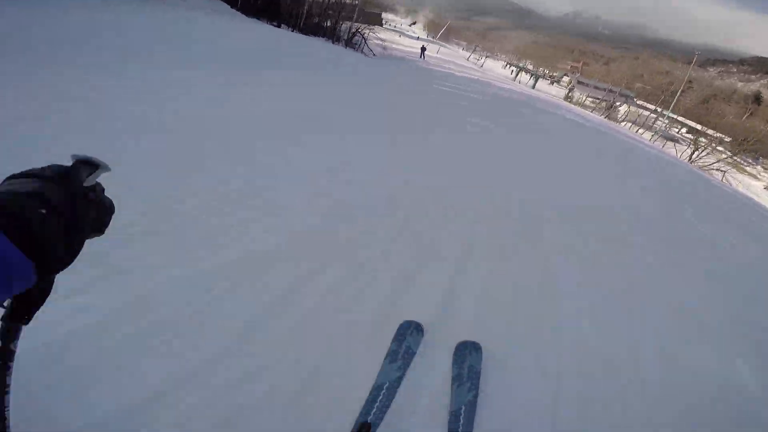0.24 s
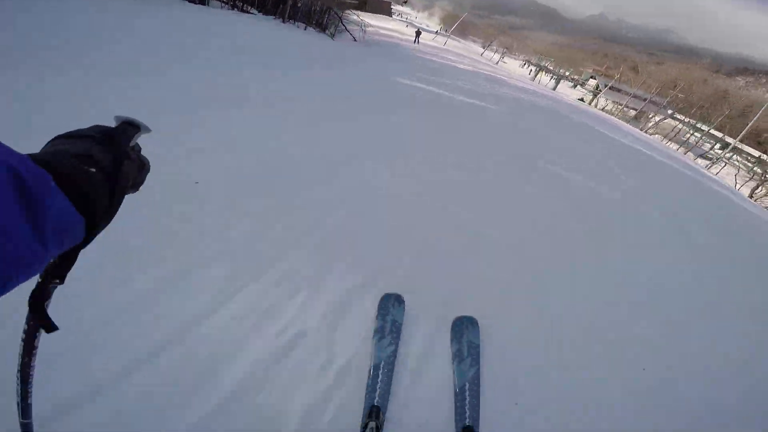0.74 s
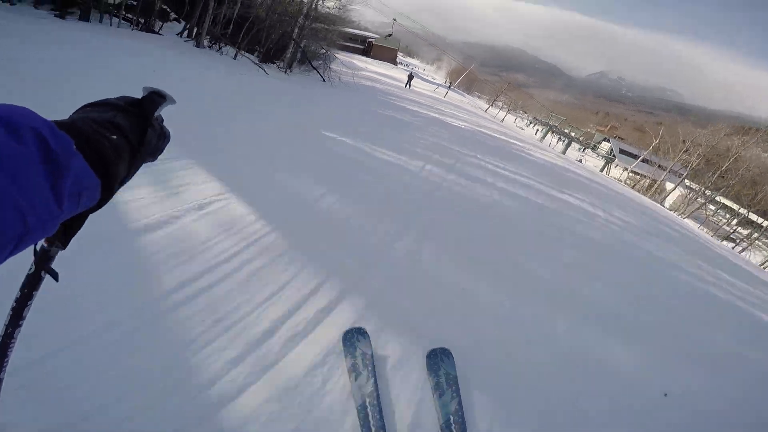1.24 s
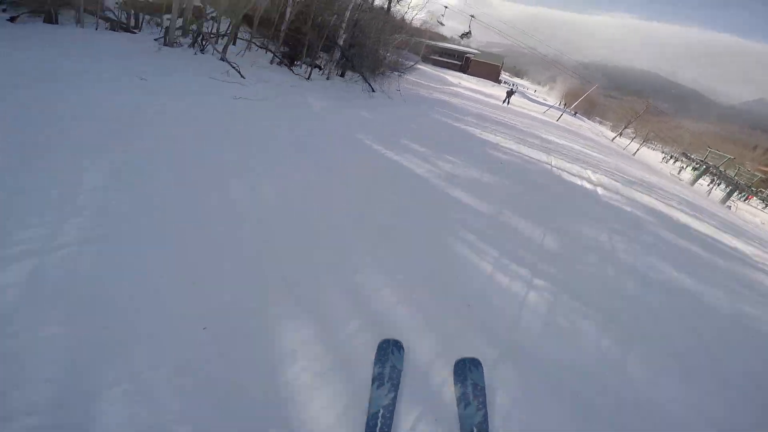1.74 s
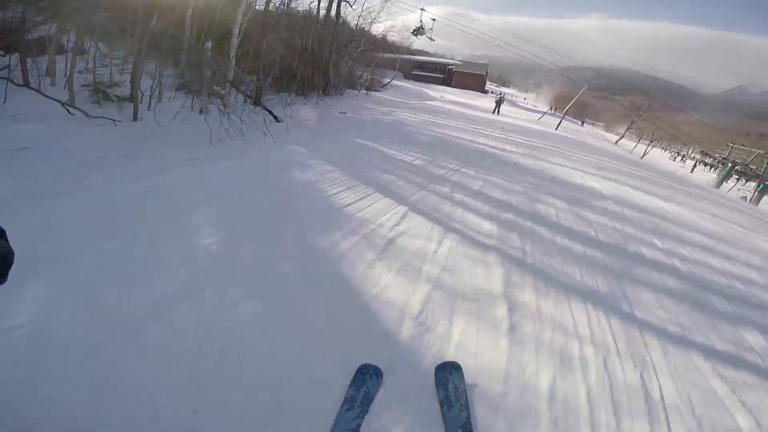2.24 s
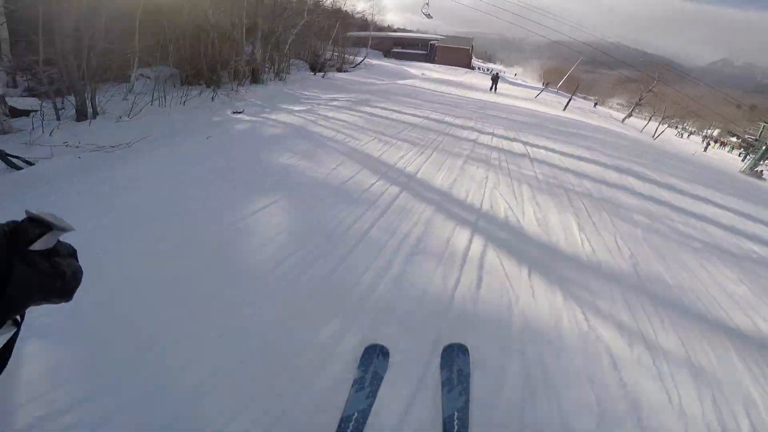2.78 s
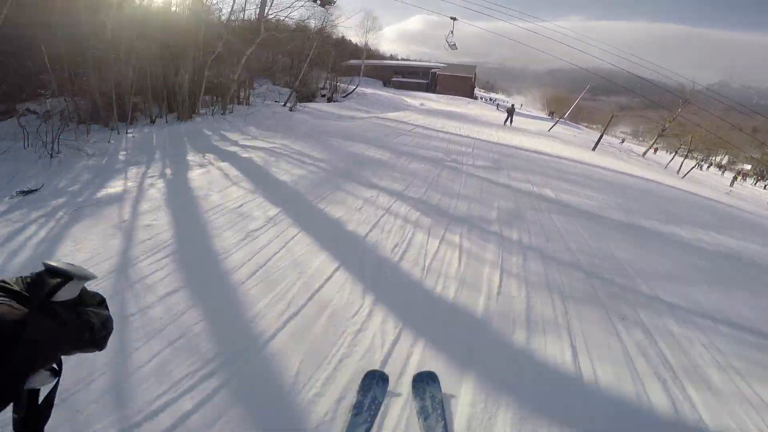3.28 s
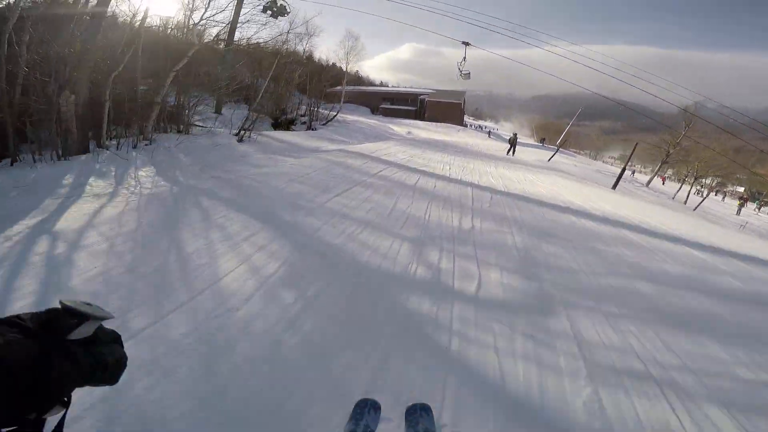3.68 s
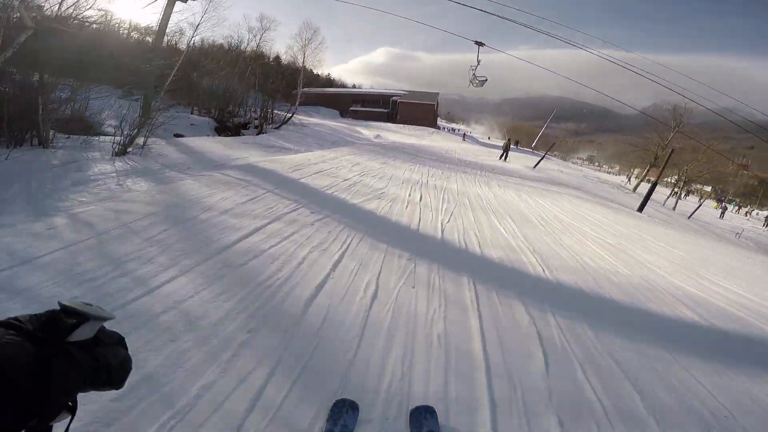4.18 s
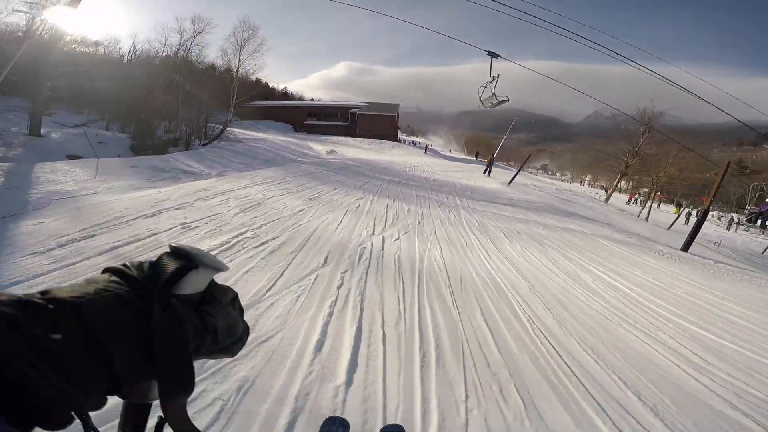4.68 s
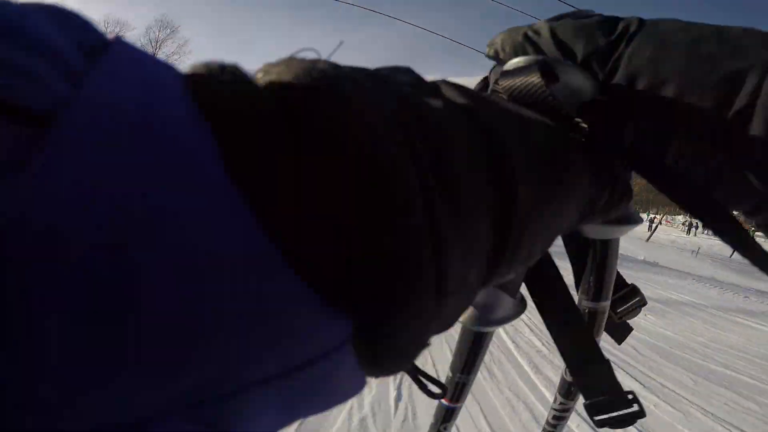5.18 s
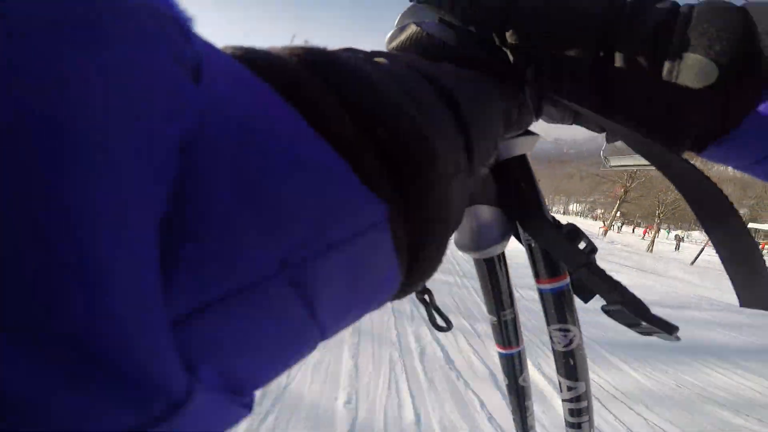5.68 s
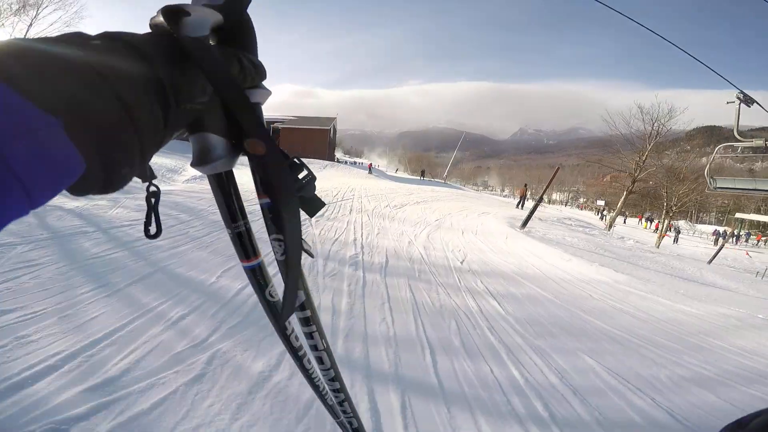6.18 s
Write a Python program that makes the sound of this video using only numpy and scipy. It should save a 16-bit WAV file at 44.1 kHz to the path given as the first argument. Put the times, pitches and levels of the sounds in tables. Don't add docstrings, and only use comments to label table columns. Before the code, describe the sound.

From inside a sealed camera case, icy ski glide crackles and thrums under rumbling wind, with a buckle tick, binding knock, pole clatter and glove rub.

```python
import sys
import numpy as np
from scipy import signal
from scipy.fft import rfft, irfft
from scipy.io import wavfile
from scipy.ndimage import uniform_filter1d

SR = 44100
rng = np.random.default_rng(int(sys.argv[2]) if len(sys.argv) > 2 else 0)


def volts(x):
    e = np.asarray(x, float) / 20
    return 10 ** e


def wav_record(signal):
    frames = np.transpose(np.atleast_2d(signal))
    bounded = np.clip(frames, -1, 1)
    quanta = np.round(bounded * 32767).astype(np.int16)
    wavfile.write(sys.argv[1], SR, quanta)


N = 283108

# t/s, level over the usual strength/dB
AIRFLOW = [(0, -2), (.45, 4.5), (.62, 13.5), (.9, 4), (1.3, 3.5), (1.55, 6.5), (1.8, 4.5), (2.0, 10.5),
           (2.25, 10), (2.6, 9), (2.9, 5), (3.3, -11), (3.7, -11), (4.3, -9), (5.15, 2.5), (5.7, -5),
           (6.1, 7), (6.42, 13)]
# t/s, load over the usual/dB
LOAD = [(0, -2.5), (.27, -5), (.37, 3.5), (.64, 6.5), (.9, 3.5), (1.2, 4), (1.55, 5.5), (1.95, 4),
        (2.27, 10.5), (2.45, 5.5), (2.9, 0.5), (3.2, -1), (4.0, -4.5), (4.5, -12), (4.9, -4), (5.3, -1),
        (6.0, -5), (6.35, 4)]
# f/Hz, level per Hz/dB
ROAR_COLOUR = [(240, 0), (400, -11), (493, -3), (535, -8), (655, 0), (740, 2.5), (826, -11.5), (1270, -1),
               (1380, -6), (1600, -1), (2080, -2), (3520, -120)]
# f/Hz, level per Hz/dB
FITTING_CRACK = [(900, -25), (1500, -40), (3500, 6), (5500, -5), (7300, 4), (8800, -7), (11000, 3),
                 (15300, -11)]


def glide():
    # t/s, edge pressure/dB, looseness of the snow/dB
    edges = [(0.0, -39, 3.5), (0.11, -41, -2), (0.16, -37.5, 0.5), (0.39, -40, 1), (0.55, -36.5, -1),
             (0.8, -37, -0.5), (1.2, -33, -3.5), (1.77, -36, -2), (2.3, -40, 2.5), (2.95, -42, 0),
             (3.3, -40, -3), (3.6, -43, -2), (4.5, -44, -4), (4.9, -45, -1), (5.3, -45.5, -3.5),
             (5.42, -46, -2), (5.9, -47, 3), (6.3, -46.5, 0.5)]
    # t/s, half length/s, extra pressure/dB
    patches = [(0.004, 0.028, -2.5), (.2, 0.019, 2), (.29, 0.021, 0), (.445, 0.0089, 5), (1.26, 0.041, 2),
               (2.02, 0.12, 3), (2.22, 0.062, 3), (3.14, 0.036, -1), (3.4, 0.021, 3), (3.75, 0.071, 2),
               (4.04, 0.12, 3.5), (4.33, .022, 2.5), (4.75, 0.086, 2.5), (5.0, 0.064, 3.5),
               (5.17, 0.074, 4), (5.33, 0.018, 5.5), (5.66, 0.013, 2), (6.04, 0.035, 1), (.6, .04, 1),
               (.69, 0.027, 3.5), (.77, .03, 1), (.9, 0.04, 2.5), (1.07, 0.048, 1), (1.45, 0.054, 1),
               (1.62, 0.032, 1), (2.29, 0.03, 3), (2.53, 0.023, 3), (2.65, .025, 0), (2.84, 0.028, 2),
               (3.06, 0.039, 3), (3.2, .02, -2), (3.33, .03, -1), (3.49, 0.025, -3.5), (3.64, 0.038, -3.5),
               (3.88, 0.024, 1.5), (4.24, 0.035, -1), (4.87, .04, -1.5), (5.25, .025, 0.5), (5.87, .04, 2)]
    # f/Hz, level per Hz/dB
    wall = [(300, -28), (1100, -28), (1480, -27), (1650, -16), (2450, -11.5), (3100, -15.5), (4600, -14.5),
            (5100, -18), (7800, -21.5), (8500, -27.5), (13500, -27), (15500, -32.5)]
    # f/Hz, width/Hz, level/dB
    case = [(1854, 205, -0.5), (2246, 102, -7), (2850, 153, -8.5), (3496, 280, -15.5), (4250, 210, -16.5),
            (6150, 89, -15.5), (7380, 210, -23), (9900, 1400, -28.5)]
    steady_db, loose_db = along(edges)
    patch_db, = swells(patches)
    pressure_db = steady_db + patch_db
    spray_db = steady_db - 8.5 + 0.48 * loose_db + 0.51 * patch_db

    grain_db = 1.83 * np.minimum(rng.exponential(1, N), 5)
    struck = rng.random(N) < 700 / SR
    grains = volts(grain_db) * struck * rng.choice([-1, 1], N)
    puff = rng.standard_normal(200) * np.exp(-np.arange(200) / 40)
    crackle = evened(signal.oaconvolve(grains, puff)[:N])

    ridges = wobble(18)
    noise = rng.standard_normal((3, N))
    ringing = volts(1.8 * ridges + 0.59 * wobble(150)) * noise[0] + 0.25 * crackle
    grit = volts(0.11 * ridges + 1.86 * wobble(63)) * noise[1] + 0.34 * crackle
    spray = volts(0.79 * ridges + 0.82 * wobble(70)) * noise[2] + 0.33 * crackle

    resonances_only = colour([*wall[:2], (20000, -58.0)], case)
    bodies = [resonances_only, colour(wall), colour(wall, case)]
    ringing, grit, spray = signal.oaconvolve([ringing, grit, spray], bodies, axes=1)[:, :N]
    split = signal.butter(4, 4750, fs=SR, output="sos")
    low = signal.sosfiltfilt(split, ringing + volts(loose_db) * grit)
    high = spray - signal.sosfiltfilt(split, spray)
    return volts(pressure_db - 0.3) * evened(low) + volts(spray_db + 1.55) * evened(high)


def chips():
    # t/s, snap level/dB, centre f/Hz, ring over snap/dB
    flying = [(0.15, -32, 3960, -8), (0.2029, -29.5, 4120, 0), (0.289, -32, 7240, 3),
              (0.3062, -30.5, 3280, 4), (0.3271, -32, 4000, 2), (0.547, -29, 2900, -1),
              (0.6065, -27, 3440, 5), (0.677, -29, 2720, 0), (0.7444, -32, 4000, -28),
              (0.817, -27.5, 3790, -8), (0.84, -40, 2600, 9), (0.945, -31, 3630, 8), (0.9782, -26, 2820, 0),
              (1.032, -30, 4050, 5.5), (1.2688, -32, 4280, 8), (1.5876, -37, 2800, 14),
              (2.0107, -24.5, 2920, -3), (2.2117, -26, 3050, 0), (2.255, -25, 3380, 1),
              (2.362, -31, 3000, 1.5), (2.563, -34, 2680, 6), (2.8406, -37.5, 3500, 8.5),
              (3.038, -31, 3400, 2), (3.7495, -40, 3180, 5), (4.059, -32, 3070, -2),
              (4.326, -43.5, 2840, 15), (5.3324, -36.5, 2650, 11), (5.842, -38, 3200, -17),
              (5.9228, -34.5, 2780, -10), (6.0462, -36, 3560, -3)]
    # t/s, snap level/dB, centre f/Hz, knock over snap/dB
    cracked = [(0.011, -32, 6430, -30), (0.295, -31, 4470, -8), (0.442, -45, 3530, 2),
               (1.535, -33, 1700, -6), (1.655, -44, 2800, 9), (2.055, -31, 3270, -3),
               (2.176, -37, 3680, -3), (2.348, -34, 5640, -4), (2.388, -36, 7500, -21),
               (2.3986, -25, 3330, -6), (2.4262, -27, 4500, -19), (2.4487, -27, 3860, -11),
               (2.4733, -31.5, 3900, -12), (2.5951, -27, 2970, -22), (2.6486, -39, 2470, -7),
               (2.6825, -30.5, 2670, -9), (2.75, -30, 3300, -22), (2.785, -32, 3400, -20),
               (2.9619, -31, 3670, -12), (5.218, -38, 3870, -2), (5.6576, -46, 3040, 4),
               (.4152, -36, 3300, -25), (.6337, -30, 3100, -27), (1.0249, -30, 4200, -27),
               (2.141, -33, 4000, -25), (2.3, -35, 3700, -25), (2.518, -33, 3600, -22),
               (2.543, -39, 4000, -25), (2.848, -41, 3000, -25)]
    usual_ring_db, usual_knock_db = -4, -43
    rows = [(*chip, usual_knock_db) for chip in flying]
    rows += [(*chip[:3], usual_ring_db, chip[3]) for chip in cracked]
    out, t = np.zeros(N), np.arange(900) / SR
    for s, snap_db, hz, ring_db, knock_db in rows:
        noise = rng.standard_normal(900)
        hard_break = 6 * (t == t[8])
        crack = (noise + hard_break) * np.minimum(t / 0.00051, 1) * np.exp(-t / 0.0021)
        pitch = hz * (0.79 + 0.15 * np.minimum(t / 0.0084, 1))
        snap = through_wall(resonate(resonate(crack, pitch, 0.5 * hz), pitch, 0.5 * hz))
        ring = through_wall(resonate(resonate(crack, 1887, 140), 2090, 280))
        knock = resonate(resonate(noise * np.exp(-t / 0.0051), 770, 610), 710, 860)
        chip = volts(4) * peaked(snap) + volts(ring_db) * peaked(ring) + volts(knock_db) * peaked(knock)
        add(out, s - 0.0004, volts(snap_db) * chip)
    return out


def boards():
    # t/s, peak level/dB, pitch f/Hz
    slaps = [(0.683, -46, 188), (1.038, -20.5, 111), (1.208, -34, 121), (1.414, -40, 200),
             (1.473, -29, 200), (1.546, -32, 167), (1.595, -25, 170), (1.673, -26, 128), (1.726, -30, 250),
             (1.824, -27.5, 102), (2.039, -22.5, 126), (2.089, -20, 227), (2.323, -24, 246),
             (2.17, -21, 130), (2.231, -29, 221), (2.856, -28, 197), (2.894, -23, 158), (2.986, -27, 136),
             (3.342, -31, 103), (4.95, -36, 135), (5.101, -34.5, 192), (5.427, -34, 118), (5.698, -31, 175),
             (5.867, -29, 130), (5.929, -31, 102), (6.131, -31, 140), (6.221, -20.5, 159),
             (6.247, -21.5, 151), (6.364, -15.5, 121), (6.383, -14.5, 145)]
    load_db, = along(LOAD)
    air_db, = along(AIRFLOW)
    flutter_db = -50 + 0.58 * load_db + 0.28 * air_db
    thrum_db = -54 + load_db
    bumps = wobble(29)
    flutter = band(92.5, 159.7) + 0.75 * band(147.4, 234.0)
    flutter = evened(flutter * volts(1.7 * bumps))
    shake = band(188, 368)
    thrum = shake + 0.9 * resonate(shake, 395, 125)
    thrum = evened(thrum * volts(1.0 * bumps + 0.81 * wobble(45)))
    out = volts(flutter_db) * flutter + volts(thrum_db) * thrum

    t = np.arange(2000) / SR
    shape = t / 0.004 * np.exp(-t / 0.0029)
    noise = rng.standard_normal((len(slaps), 2000))
    rattles = signal.oaconvolve(noise, colour(ROAR_COLOUR)[None], axes=1)[:, :2000]
    for (s, db, hz), rattle in zip(slaps, rattles):
        tone = np.sin(2 * np.pi * hz * t) + 0.18 * np.sin(2 * np.pi * 355 * t)
        thump = peaked(shape * tone)
        add(out, s, volts(db - 5.5) * (thump + volts(-15) * peaked(shape * rattle)))
    return out


def thuds():
    # t/s, peak level/dB
    ridges = [(0.473, -37), (0.509, -33.5), (0.617, -42), (0.667, -47), (0.819, -38), (0.869, -36),
              (0.916, -43), (1.042, -32), (1.109, -41), (1.183, -36), (1.352, -41), (1.417, -29),
              (1.476, -37), (1.546, -38), (1.598, -30.5), (1.674, -29.5), (1.727, -30), (1.78, -34.5),
              (1.828, -35), (1.886, -45), (1.929, -35), (1.978, -35), (2.014, -36), (2.062, -35),
              (2.093, -31), (2.138, -34), (2.173, -34), (2.233, -35), (2.271, -29), (2.328, -34.5),
              (2.354, -39), (2.426, -28.5), (2.592, -33), (2.621, -32), (2.677, -33), (2.735, -35.5),
              (2.823, -32), (3.113, -42), (3.202, -46), (3.349, -37.5)]
    note_hz, swell_s = 345.8, 0.004
    out, t = np.zeros(N), np.arange(2500) / SR
    for (s, db), off in zip(ridges, rng.uniform(-1.32, 1, len(ridges))):
        hz = note_hz * (1 + 0.072 * off)
        ring = t / swell_s * np.exp(-t / swell_s) * np.sin(2 * np.pi * hz * t)
        add(out, s, volts(db - 2) * peaked(ring))
    return out


def pole_clacks():
    # t/s, peak level/dB, brightness per octave/dB, crack level/dB
    contacts = [
        (5.3729, -12, 10, -7),
        (5.3736, -5.5, 2, -12),
        (5.3761, -13, 6.5, -6),
        (5.3791, -6.5, -4.5, -10),
        (5.3818, -13, 5, -8),
        (5.3856, -19.5, .5, -17),
        (5.392, -34.5, 6, -8),
        (5.3961, -28, -10, -18),
        (5.4335, -39, -10, -14),
    ]
    # f/Hz, level/dB, t60/s
    tubes = [(1600, -18, .06), (1792, -3.5, .048), (1989, -10, .061), (2045, 1.5, .009), (2527, -.5, .048),
             (2865, -4.5, .06), (3088, -6, .021), (3540, -.5, .048), (3900, -4, .018), (4190, -1, .028),
             (4990, -5, .011), (8400, -38, .13), (8630, -29, .065), (8840, -29, .07)]
    # f/Hz, level per Hz/dB
    crack = [(1400, -30), (1700, -10), (4300, -9), (5300, -11), (6400, -19), (7800, -32), (8400, -14),
             (9600, -6), (10600, -2), (11300, -14), (13000, -10), (15300, -16)]
    return strike(contacts, tubes, crack, crack_s=0.0026, floor_hz=1500)


def buckle_ticks():
    # t/s, peak level/dB, brightness per octave/dB, crack level/dB
    ticks = [
        (.121, -13.5, -10, -13),
        (.122, -10, 2.5, -13),
        (.1243, -23.5, 6, -9),
        (6.4163, -20, 0, -8),
    ]
    # f/Hz, level/dB, t60/s
    modes = [(1573, -11.0, 0.059), (1967, -8.1, 0.032), (2410, 1.9, 0.021), (2829, -7.7, 0.027),
             (3430, -2.1, 0.038), (4415, -12.2, 0.018), (5433, 0.0, 0.007), (7014, -15.9, 0.015)]
    return strike(ticks, modes, FITTING_CRACK, crack_s=0.001, floor_hz=1500)


def binding_knocks():
    # t/s, peak level/dB, brightness per octave/dB, crack level/dB
    knocks = [
        (3.1152, -27.5, 1.5, -12),
        (3.1413, -21, 2, -22),
        (3.1428, -22, 4.5, -22),
    ]
    # f/Hz, level/dB, t60/s
    modes = [(740, -5, .028), (1300, -2, .017), (1990, 2.5, .018), (2500, -7, .035), (3170, -7, .011),
             (5220, -13, .013)]
    return strike(knocks, modes, FITTING_CRACK, crack_s=0.0012, floor_hz=550)


def glove():
    # start t/s, length/s, rubbing level/dB, fabric rasp over it/dB
    strokes = [
        (0.254, 0.027, -44, -18),
        (6.222, 0.012, -40, -27),
        (6.257, .06, -58, -22),
        (6.308, 0.047, -44, -18),
        (6.329, 0.069, -42, -7),
        (6.354, .07, -44, -7),
    ]
    # f/Hz, level per Hz/dB
    rub_colour = [(180, -16), (300, -12), (609, -32), (748, -7.5), (839, -15), (1140, -8), (1250, -13.5),
                  (1930, -11), (2290, -15), (3420, -18), (3790, -20), (4600, -41), (5980, -33),
                  (10100, -120)]
    # f/Hz, width/Hz, level/dB
    singing = [(5230, 120, -3), (5550, 400, -6), (6850, 200, 0)]
    grab_s, let_go_s = 0.0053, 0.045
    t, rub, rasp = np.arange(N) / SR, np.zeros(N), np.zeros(N)
    for start, length, rub_db, rasp_db in strokes:
        grab = np.clip((t - start) / grab_s, 0, 1)
        stroke = grab * np.exp(-np.maximum(t - start - length, 0) / let_go_s)
        rub += volts(rub_db) * stroke
        rasp += volts(rub_db + rasp_db) * stroke
    drag = evened(signal.oaconvolve(rng.standard_normal(N), colour(rub_colour))[:N])
    fabric = band(3700, 6400)
    fabric = fabric + sum(volts(db + 11) * resonate(fabric, hz, width) for hz, width, db in singing)
    return rub * drag + rasp * evened(fabric)


def wind():
    # t/s, half length/s, slow push/dB, swirl/dB
    gusts = [(.53, 0.035, 11.5, -6), (.61, 0.038, -9, 4), (.69, 0.086, 15.5, -7), (.79, .04, -1, -3),
             (1.11, 0.024, 0, 13), (1.15, 0.084, 9, -8), (1.5, 0.028, 11.5, -6), (1.75, 0.024, -2, -5),
             (1.9, 0.034, -43, 1.5), (2.2, 0.086, -11, 8), (2.34, .04, -8, -4), (2.4, 0.067, 3, 5.5),
             (2.47, 0.025, 8, -5), (3.55, 0.61, 6, 10.5), (3.74, 0.072, -13, 4), (3.92, 0.058, -2.5, -4),
             (4.04, 0.041, -9, 5), (4.11, 0.026, 5, -2), (4.15, 0.019, -3, 12), (1.33, 0.036, 5, -4),
             (4.99, 0.022, -14, 3), (5.11, 0.021, 7.5, 6.5), (5.2, 0.047, -34, 1), (5.29, 0.033, 9.5, -5),
             (5.87, 0.019, 0, 7), (5.92, 0.027, -12, 0), (6.0, 0.034, 5.5, -8), (6.38, 0.031, -3, 11.5)]
    air_db, = along(AIRFLOW)
    load_db, = along(LOAD)
    push_db, swirl_db = swells(gusts)
    buffet_db = -41 + 0.42 * air_db + push_db
    eddy_db = -43 + air_db + swirl_db
    roar_db = -55.5 + 0.39 * air_db + 0.13 * load_db
    buffet = levelled(band(18.5, 43.2), 0.17, 0.049)
    eddies = levelled(band(36.2, 78.5), 0.3, 0.056)
    rush = rng.standard_normal(N) * volts(1.87 * wobble(10.0))
    roar = evened(signal.oaconvolve(rush, colour(ROAR_COLOUR))[:N])
    shield = np.clip((np.arange(N) / SR - 4.65) / 0.23, 0, 1)
    roar = roar + 4.0 * shield * resonate(roar, 836, 42)
    return volts(buffet_db) * buffet + volts(eddy_db) * eddies + volts(roar_db) * roar


def strike(hits, modes, crack_colour, crack_s, floor_hz):
    out, t, body = np.zeros(N), np.arange(5000) / SR, colour(crack_colour)[:600]
    contact = np.sin(np.pi / 2 * np.minimum(t / 0.0005, 1)) ** 2
    for s, db, tilt_db, crack_db in hits:
        ring = np.zeros(5000)
        for k, (hz, top_db, t60) in enumerate(modes):
            mode_db = top_db + tilt_db * np.log2(min(hz, 5400) / 3000) - 60 * t / t60
            ring += (-1) ** k * volts(mode_db) * np.sin(2 * np.pi * hz * t)
        hiss = rng.standard_normal(5000) * np.exp(-t / crack_s)
        crack = signal.oaconvolve(hiss, body)[:5000]
        add(out, s, volts(db) * (peaked(ring * contact) + volts(crack_db) * peaked(crack)))
    return signal.sosfilt(signal.butter(9, floor_hz, "high", fs=SR, output="sos"), out)


def through_wall(x):
    return signal.sosfilt(signal.butter(4, 1450, "high", fs=SR, output="sos"), x)


def colour(points, peaks=()):
    hz = np.abs(np.fft.fftfreq(8192, 1 / SR))
    f, db = np.transpose(points)
    power = volts(np.interp(np.log(hz + 1), np.log(f), db, left=-100)) ** 2
    for centre, width, top_db in peaks:
        power = power + volts(top_db) ** 2 / (1 + (2 * (hz - centre) / width) ** 2) ** 2
    log_gain = 0.5 * np.log(power + 1e-10)
    return np.fft.ifft(np.exp(np.conj(signal.hilbert(log_gain)))).real[:4096]


def resonate(x, hz, width):
    turn = np.exp(2j * np.pi * np.cumsum(hz * np.ones(len(x))) / SR)
    r = np.exp(-np.pi * width / SR)
    return 2 * (turn * signal.lfilter([1 - r], [1, -r], x / turn + 1e-18)).real


def wobble(rate_hz):
    z, hz = rfft(rng.standard_normal(N)), np.fft.rfftfreq(N, 1 / SR)
    return evened(irfft(z * (hz > 5) / (1 + (hz / rate_hz) ** 2), N))


def band(lo_hz, hi_hz):
    edges = signal.butter(3, [lo_hz, hi_hz], "band", fs=SR, output="sos")
    return evened(signal.sosfilt(edges, rng.standard_normal(N)))


def levelled(x, share, seconds):
    local = np.sqrt(abs(uniform_filter1d(x ** 2, int(seconds * SR))) + 0.02)
    return evened(x / local ** np.clip(share, 0, 1))


def along(rows):
    s, *columns = np.transpose(rows)
    return [np.interp(np.arange(N) / SR, s, c) for c in columns]


def swells(rows):
    s, half, *columns = np.transpose(rows)
    bells = np.exp(-((np.arange(N)[:, None] / SR - s) / half) ** 2)
    return [bells @ c for c in columns]


def evened(x):
    return x / np.sqrt(np.mean(x ** 2) + 1e-20)


def peaked(x):
    return x / abs(x).max()


def add(mix, s, sound):
    part = mix[round(s * SR):][:len(sound)]
    part += sound[:len(part)]


def scene():
    mix = glide() + chips() + boards() + thuds()
    mix = mix + pole_clacks() + buckle_ticks() + binding_knocks()
    mix = mix + glove() + wind()
    return np.array([mix, mix])


def band_limit(x):
    return signal.sosfilt(signal.butter(12, 16630, fs=SR, output="sos"), x)


def record(dry):
    ceiling, edge_hz = 0.8, 15330
    held = ceiling * np.tanh(dry / ceiling)
    steep = signal.firwin(801, edge_hz, window=("kaiser", 9), fs=SR)
    limited = signal.oaconvolve(held, steep[None], "same")
    return band_limit(limited)


dry = scene()
out = record(dry)
wav_record(out)
```